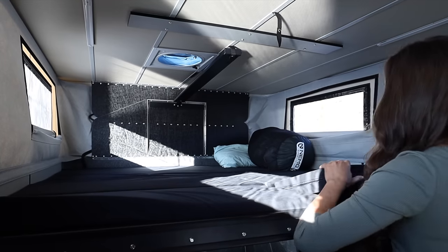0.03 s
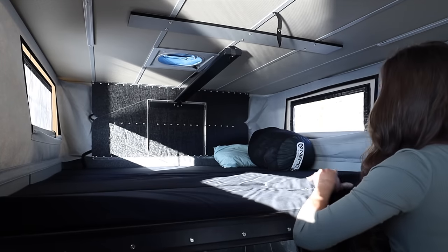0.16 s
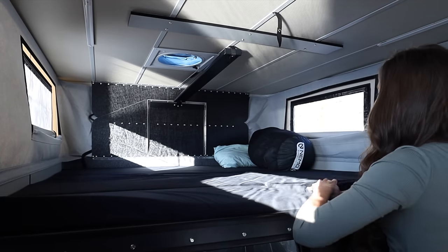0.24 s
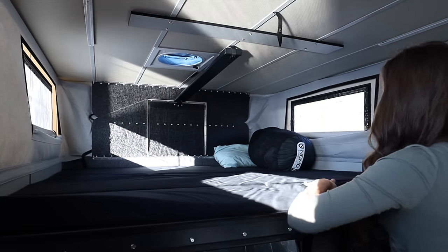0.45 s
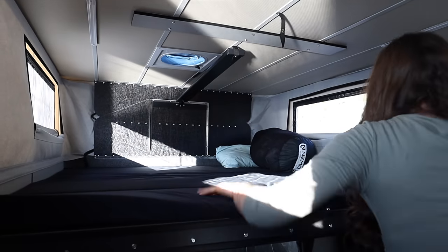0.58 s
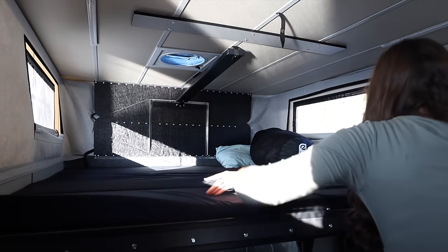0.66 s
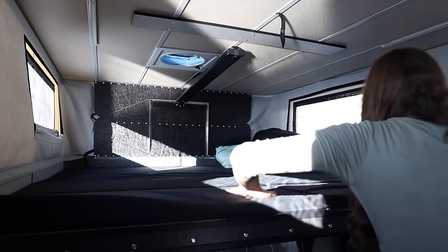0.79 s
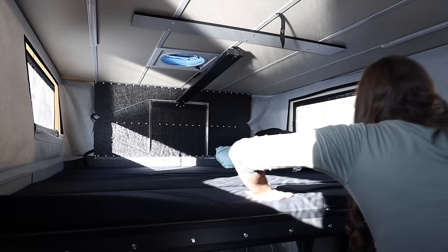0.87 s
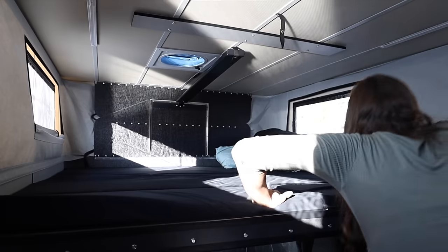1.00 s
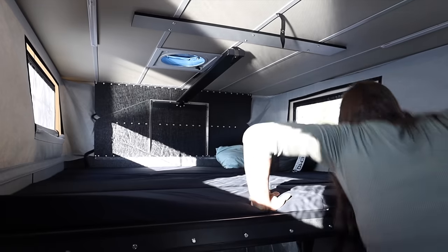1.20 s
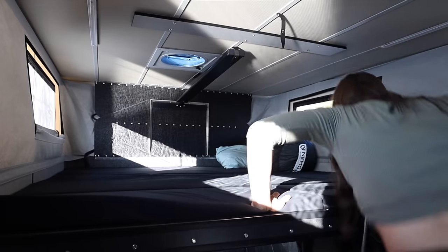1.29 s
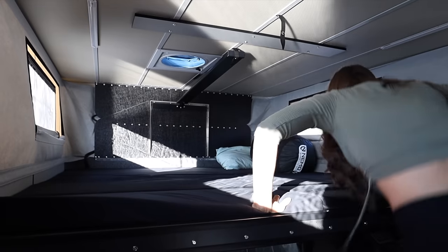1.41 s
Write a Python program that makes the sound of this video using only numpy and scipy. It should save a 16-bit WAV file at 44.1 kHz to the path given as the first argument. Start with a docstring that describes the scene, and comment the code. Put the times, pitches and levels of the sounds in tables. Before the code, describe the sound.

A quick swish of bedding ends in the low thump of a closing panel and a thin metallic rattle. Someone leans on the bed, which gives a run of woody knocks over rustling fabric in a small, padded camper.

```python
"""Inside a small camper, bedding swishes across the bed and a panel drops shut with a double thump.
A small metal fitting rattles and rings on. Someone leans on the bed platform, which slips under
the load and creaks in a run of dry, separate knocks. Cloth rustles and brushes throughout, its
fibres catching as it slides, over a faint rumble."""
import sys
import numpy as np
from scipy import signal
from scipy.io import wavfile

SR = 44100
rng = np.random.default_rng(int(sys.argv[2]) if len(sys.argv) > 2 else 0)


def to_wav(sig):
    """Store sig (one row per channel, or 1-D mono) as 16-bit WAV at the path in sys.argv[1].

    Samples outside -1..1 are clipped; the rate is SR.
    """
    pcm = np.clip(np.atleast_2d(sig), -1, 1) * 32767
    pcm = np.round(pcm).astype(np.int16)
    wavfile.write(sys.argv[1], SR, pcm.T)  # frames by channels


N = 63945
TIME = np.arange(N) / SR


def from_db(db):
    """Decibels to gain."""
    return 10 ** (np.asarray(db) / 20)


def rms_one(x):
    """Scale to rms 1."""
    return x / np.sqrt(np.mean(x ** 2) + 1e-20)


def peak_one(x):
    """Scale to peak 1."""
    return x / np.abs(x).max()


def cut(x, hz, kind, order=2):
    """Butterworth filter."""
    sos = signal.butter(order, np.clip(hz, 10, .45 * SR), kind, fs=SR, output="sos")
    return signal.sosfilt(sos, x)


def noise(hz, kind="band"):
    """Filtered white noise, rms 1."""
    return rms_one(cut(rng.standard_normal(N), hz, kind))


def click(start_s):
    """Unit impulse."""
    x = np.full(N, 1e-18)
    x[int(np.clip(start_s * SR, 0, N - 1))] = 1
    return x


def resonance(x, hz, width_hz):
    """Two-pole resonator."""
    radius = np.exp(-np.pi * width_hz / SR)
    return signal.lfilter([1, 0, -1], [1, -2 * radius * np.cos(2 * np.pi * hz / SR), radius ** 2], x)


def decay(start_s, t60_s):
    """Step onset, exponential decay."""
    return (TIME >= start_s) * from_db(-60 * np.maximum(TIME - start_s, 0) / t60_s)


def ring(start_s, hz, t60_s):
    """One struck mode."""
    return decay(start_s, t60_s) * np.sin(2 * np.pi * hz * (TIME - start_s))


def knock(start_s, hz, width_hz, low_hz, top_hz):
    """Heavily damped board resonance, band-limited, peak 1."""
    softened = cut(resonance(click(start_s), hz, width_hz), top_hz, "low")
    return peak_one(cut(softened, low_hz, "high", order=1))


def level(curve):
    """Gain envelope from (time_s, level_db) points."""
    return from_db(np.interp(TIME, *np.transpose(curve)))


def drift(rate_hz):
    """Smooth random signal, rms 1."""
    return rms_one(cut(rng.standard_normal(2 * N), rate_hz, "low")[N:])


def rough_noise(spectrum, grain_db, flicker_db):
    """Half-octave noise bands with a shared fast grain and a slower flicker each; rms 1."""
    hz, density_db = np.transpose(spectrum)
    edges_hz = 22 * 2 ** np.arange(0, 10, .5)
    white = rng.standard_normal((2, N))  # adjacent bands use independent noise
    grainy = white * from_db(grain_db * drift(rate_hz=300))
    out = 0
    for k, (low_hz, high_hz) in enumerate(zip(edges_hz, edges_hz[1:])):
        band_db = np.interp(np.log(low_hz * high_hz) / 2, np.log(hz), density_db)
        band = cut(grainy[k % 2], [low_hz, high_hz], "band")
        out += from_db(band_db + flicker_db * drift(rate_hz=24.8)) * band
    return rms_one(out)


# Rumble spectrum: freq_hz, relative_density_db
RUMBLE_SPECTRUM = [(15, -37), (25, -19), (344, -6.5), (416, -4), (476, -4), (2160, -15), (3520, -28),
                   (14800, -56), (16000, -39)]


def rumble():
    """Faint, continuous background noise, strongest in the low mids."""
    return from_db(-53.5) * rough_noise(RUMBLE_SPECTRUM, grain_db=-2, flicker_db=-1.7)


# Sleeve slide envelope: time_s, level_db
SLEEVE_ENVELOPE = [(.76, -65), (.85, -59.5), (.95, -59), (1.03, -60.5), (1.2, -67), (1.3, -61.5),
                   (1.37, -59), (1.43, -65)]


def sleeve():
    """Smooth fabric slides over the cover with a thin hiss."""
    return level(SLEEVE_ENVELOPE) * noise([3750, 13000])


# Cloth rustle envelope: time_s, level_db
RUSTLE_ENVELOPE = [(0, -58.5), (.3, -35.5), (.45, -49), (.56, -46), (.67, -50), (.75, -47), (.81, -51.5),
                   (.89, -45.5), (.95, -46.5), (1.03, -42), (1.12, -41.5), (1.21, -41.5), (1.28, -42.5),
                   (1.35, -43.5), (1.41, -43), (1.45, -60)]
# Cloth rustle spectrum: freq_hz, relative_density_db
RUSTLE_SPECTRUM = [(30, -24), (55, 8), (110, 1.5), (190, 6), (360, 3), (600, 0), (1300, -9), (2000, -10.5),
                   (3000, -17.5), (7000, -25), (12800, -37.5), (16000, -16)]


def rustle():
    """Cloth moves with the body; catching fibres roughen the friction noise."""
    return level(RUSTLE_ENVELOPE) * rough_noise(RUSTLE_SPECTRUM, grain_db=2.46, flicker_db=2.8)


# Bedding slide envelope: time_s, level_db
SWISH_ENVELOPE = [(0, -47), (.04, -46), (.11, -50), (.16, -42), (.2, -33.5), (.232, -28), (.275, -34),
                  (.3, -50.5), (.33, -38), (.39, -48), (.46, -94)]
# Bedding slide spectrum: freq_hz, relative_density_db
SWISH_SPECTRUM = [(30, -23), (55, -26), (120, -16.5), (180, 7), (280, -28), (400, -5.5), (1000, -6),
                  (1600, -5.5), (3000, -12.5), (8000, -16), (12000, -28), (14500, -29), (16000, -46)]


def bedding():
    """Bedding drags across the bed in one swish of friction noise."""
    return level(SWISH_ENVELOPE) * rough_noise(SWISH_SPECTRUM, grain_db=-1.5, flicker_db=1.33)


# Brushes and pats on cloth: peak_s, rub_db, hiss_db, attack_s, t60_s, centre_hz
CLOTH_BRUSHES = [(.3255, -20.5, -67, 0.00071, 0.057, 1150), (0.4218, -35, -50, 0.00049, 0.025, 1120),
                 (.632, -46, -57, 0.026, 0.081, 1060), (0.683, -51, -54, .001, 0.012, 2400),
                 (0.7226, -31.5, -71, 0.00033, 0.075, 1565), (0.776, -48.5, -61, 0.00075, 0.045, 2700),
                 (0.8, -44.5, -54.5, .0003, 0.026, 2720), (1.2, -38.5, -47, 0.0011, 0.041, 1430),
                 (1.388, -36, -72, 0.0036, 0.067, 725)]


def brushes(band_ratio=1.393, body_db=-7.5):
    """Brief cloth rubs: a broad noise band, body below it, crisp hiss above."""
    out = 0
    for peak_s, rub_db, hiss_db, attack_s, t60_s, centre_hz in CLOTH_BRUSHES:
        rub = noise([centre_hz / band_ratio, centre_hz * band_ratio])
        body = from_db(body_db) * noise([centre_hz / 6, centre_hz])
        hiss = noise([2175, 8700])
        swell = (TIME < peak_s) * np.exp(np.minimum(TIME - peak_s, 0) / attack_s)
        envelope = swell + decay(peak_s, t60_s)
        out += envelope * (from_db(rub_db) * (rub + body) + from_db(hiss_db) * hiss)
    return out


# Bumps on the platform edge: start_s, level_db, pitch_hz, width_hz
EDGE_BUMPS = [(0.422, -30.5, 284, 200), (0.848, -37.5, 300, 150), (1.3162, -23.5, 231, 160),
              (1.3884, -26.5, 293, 70), (1.395, -28.5, 345, 71), (1.4068, -27, 302, 70),
              (1.4127, -29.5, 330, 70)]


def bumps(top_hz=602):
    """Padded contacts ring the platform briefly."""
    out = 0
    for start_s, level_db, pitch_hz, width_hz in EDGE_BUMPS:
        board = resonance(click(start_s), pitch_hz, width_hz)
        out += from_db(level_db) * peak_one(cut(board, top_hz, "low"))
    return out


# Slips of the loaded platform: start_s, knock_db, pitch_hz, snap_db
PLATFORM_SLIPS = [(0.5047, -17, 265, -22.5), (.9943, -17, 170, -12.5), (1.0351, -19, 162, -7.5),
                  (1.068, -16.5, 164, -13), (1.114, -15.5, 173, -15), (1.1373, -16, 180, -29.5),
                  (1.158, -16.5, 171, -33), (1.180, -17, 164, -38)]
# Joint modes: freq_hz, gain_db, width_hz
JOINT_MODES = [(546, -9, 110), (1140, 0.5, 485), (2266, 5, 780)]


def creak(crack_hz=4070, crack_db=-22):
    """Each slip knocks the board; the joint adds a woody snap with a thin crack."""
    out = 0
    for start_s, knock_db, pitch_hz, snap_db in PLATFORM_SLIPS:
        slip = click(start_s)
        board = knock(start_s, pitch_hz, width_hz=145, low_hz=53, top_hz=833)
        joint = sum(from_db(db) * resonance(slip, hz, width_hz) for hz, db, width_hz in JOINT_MODES)
        crack = resonance(resonance(slip, crack_hz, width_hz=1150), crack_hz, width_hz=1600)
        snap = peak_one(cut(joint, 3100, "low", order=6)) + from_db(crack_db) * peak_one(crack)
        out += from_db(knock_db) * board + from_db(snap_db) * snap
    return out


# Contacts of the metal fitting: start_s, level_db
FITTING_CONTACTS = [(.275, -34), (.308, -54), (.342, -34.5), (0.354, -38.5), (0.366, -50), (0.387, -48),
                    (0.403, -73), (0.4213, -41.5), (0.436, -46.5), (0.464, -58)]
# Fitting modes: freq_hz, gain_db, t60_s
FITTING_MODES = [(5840, 0, .08), (5940, -6, .07), (9006, -17, .11), (14210, -15, .1)]


def fitting(tick_db=-27, rise_s=.0033, flutter_db=1.5):
    """A small metal part rattles: each graze gives a faint tick and a fast-rising, fluttering ring."""
    out = 0
    for start_s, level_db in FITTING_CONTACTS:
        tick = cut(rng.standard_normal(N), 4000, "high") * decay(start_s, t60_s=.02)
        modes = sum(from_db(db + rng.normal(0, 1)) * ring(start_s, hz * rng.normal(1, .0031), t60_s)
                    for hz, db, t60_s in FITTING_MODES)
        rise = np.clip((TIME - start_s) / rise_s, 0, 1)
        out += from_db(level_db) * (from_db(tick_db) * tick + rise * modes)
    return out * from_db(flutter_db * drift(rate_hz=120))


# Low cabin modes: freq_hz, level_db, t60_s
CABIN_MODES = [(41.6, -37.5, 0.75), (53.7, -27, 0.12)]


def cabin_sway(start_s):
    """A blow sets the cabin swaying on two low modes."""
    return sum(from_db(db) * ring(start_s, hz, t60_s) for hz, db, t60_s in CABIN_MODES)


def cabin_reverb(x, wet_db=-20.5, delay_s=.0037, t60_s=.16, top_hz=2230):
    """Short, dull reverberation of a small padded space."""
    tail = cut(rng.standard_normal(N) * decay(delay_s, t60_s), top_hz, "low", order=1)
    return from_db(wet_db) * signal.fftconvolve(x, tail / np.linalg.norm(tail))[:N]


# Blows on the panel: start_s, thud_db, clack_db, ring_db, crack_db
PANEL_BLOWS = [(0.3285, -6, -15, -21, -21), (0.3384, -8, -13, -26, -38)]
# Panel modes: freq_hz, gain_db, t60_s
PANEL_MODES = [(66.7, 2, 0.16), (114.7, -9.5, 0.057), (154, 10, 0.11), (259, -3, 0.071), (341, -1, 0.14),
               (421, 0, 0.087), (510, 3, 0.15), (610, -30, 0.14), (890, -6.5, 0.041), (1110, -31, 0.06),
               (1270, -22, 0.073), (1487, -28, 0.055), (1650, -26, .09), (1800, -33, 0.07)]


def panel(clack_hz=1280, spread_s=.00396):
    """Each blow gives a dull thud, a woody clack and a crack; modes start as it spreads over the panel."""
    out = 0
    for start_s, thud_db, clack_db, ring_db, crack_db in PANEL_BLOWS:
        thud = knock(start_s, hz=262, width_hz=216, low_hz=45, top_hz=870)
        clack = noise([clack_hz / 1.29, clack_hz * 1.22]) * decay(start_s, t60_s=.02)
        crack = noise(7850, "low") * decay(start_s, t60_s=.015)
        modes = sum(from_db(db + rng.normal(0, 2)) * ring(start_s + rng.uniform(0, spread_s), hz, t60_s)
                    for hz, db, t60_s in PANEL_MODES)
        out += from_db(thud_db) * thud + from_db(clack_db) * clack
        out += from_db(crack_db) * crack + from_db(ring_db) * modes
    return out


def scene():
    """Mono mix; only the panel drives the cabin's reverb and sway."""
    thump = panel()
    background = rumble()
    cloth = bedding() + rustle() + sleeve() + brushes()
    cabin = cabin_reverb(thump) + cabin_sway(start_s=PANEL_BLOWS[0][0])
    return (background + cloth + bumps() + creak() + fitting() + cabin + thump)[None]


def record(dry, cutoff_hz=15900):
    """Steep elliptic low-pass."""
    return signal.sosfilt(signal.ellip(10, .1, 80, cutoff_hz, fs=SR, output="sos"), dry)


dry = scene()
out = record(dry)
to_wav(out)
```